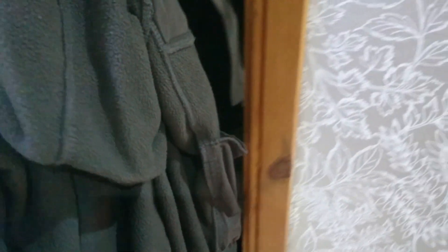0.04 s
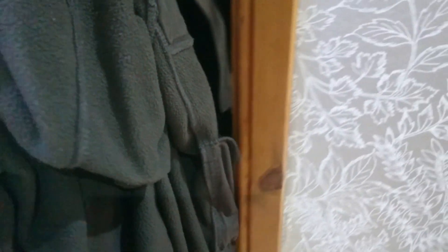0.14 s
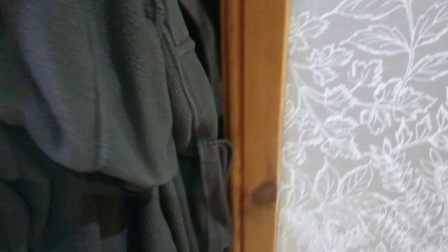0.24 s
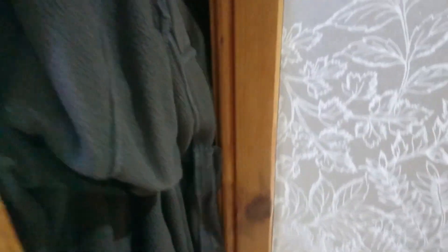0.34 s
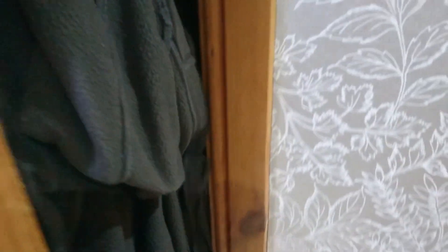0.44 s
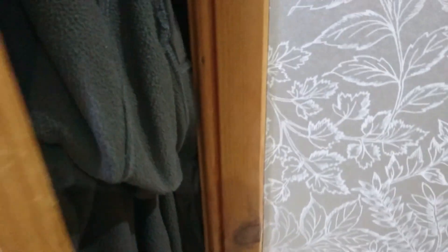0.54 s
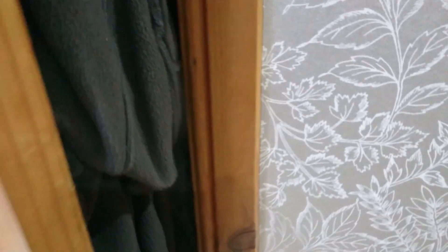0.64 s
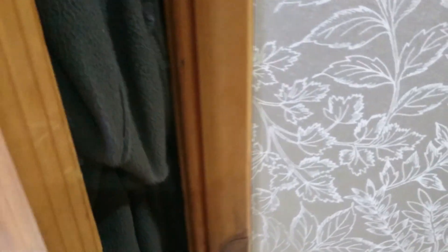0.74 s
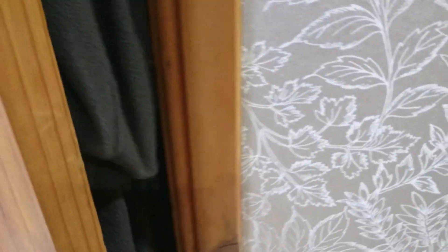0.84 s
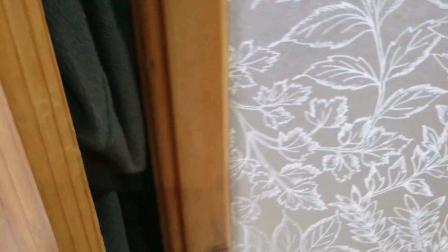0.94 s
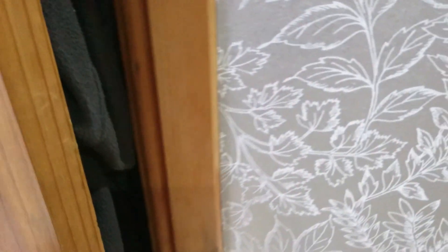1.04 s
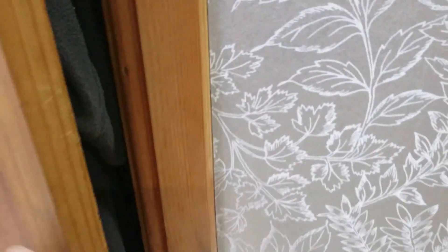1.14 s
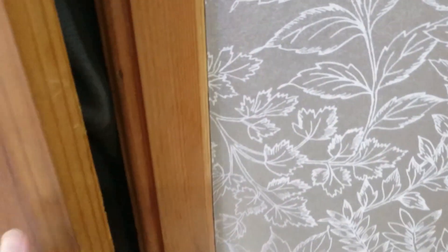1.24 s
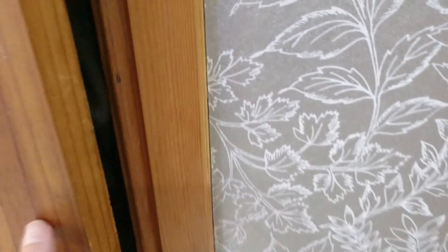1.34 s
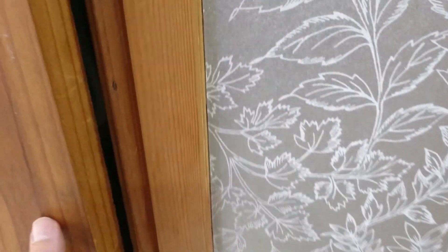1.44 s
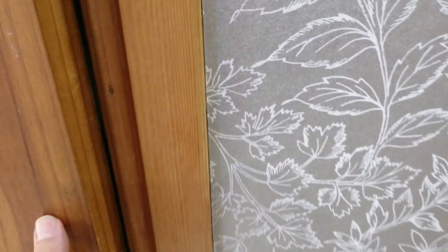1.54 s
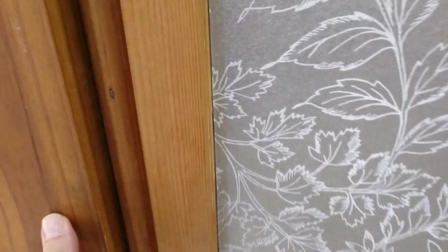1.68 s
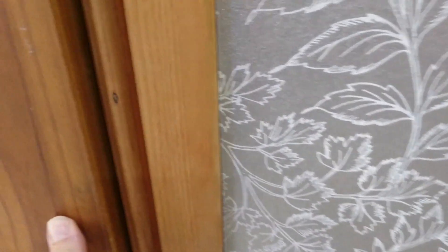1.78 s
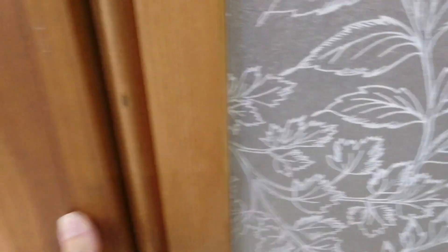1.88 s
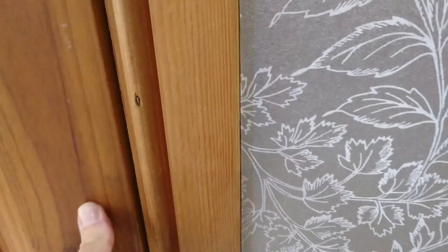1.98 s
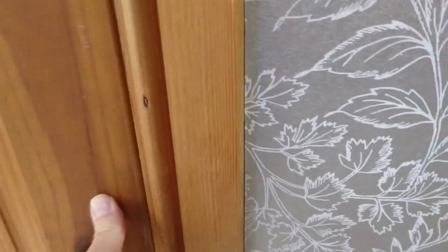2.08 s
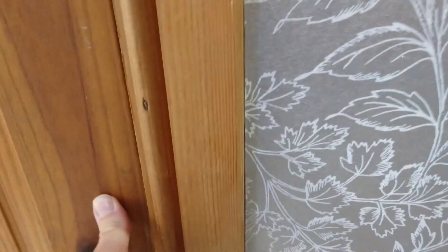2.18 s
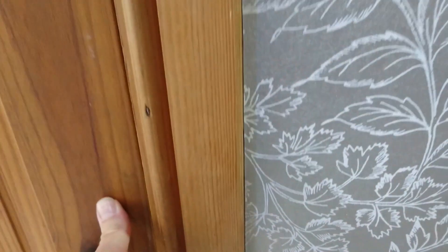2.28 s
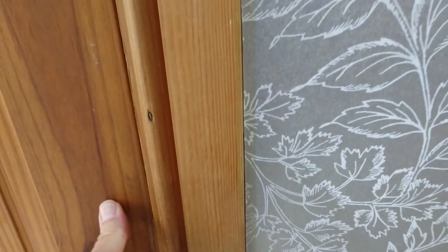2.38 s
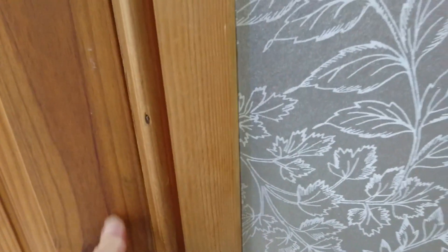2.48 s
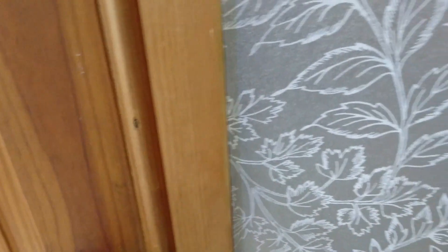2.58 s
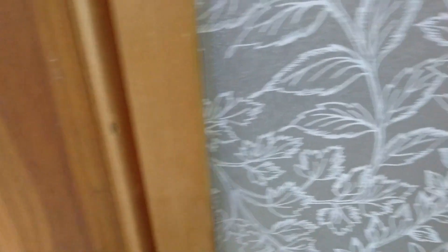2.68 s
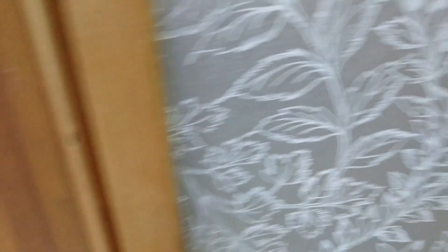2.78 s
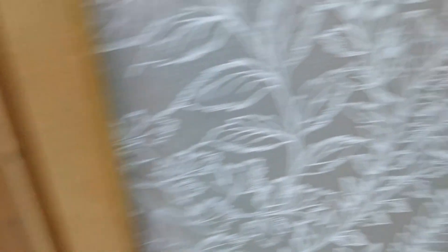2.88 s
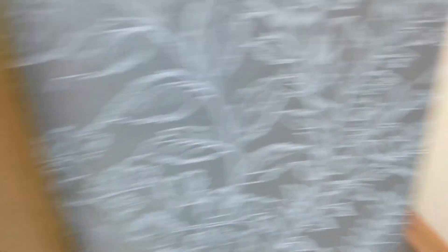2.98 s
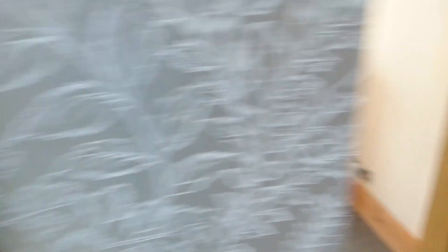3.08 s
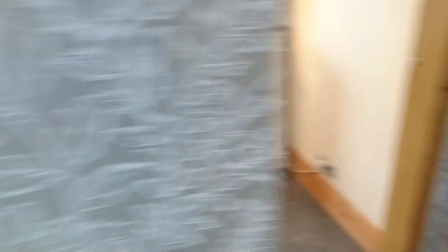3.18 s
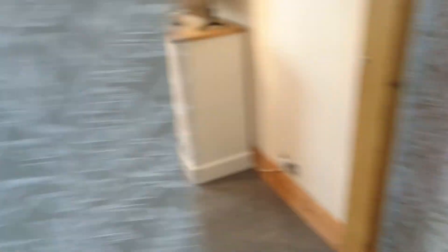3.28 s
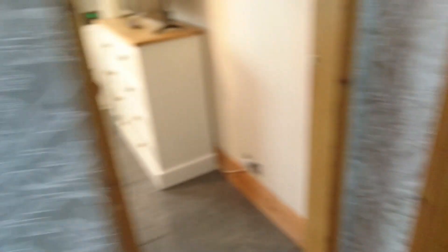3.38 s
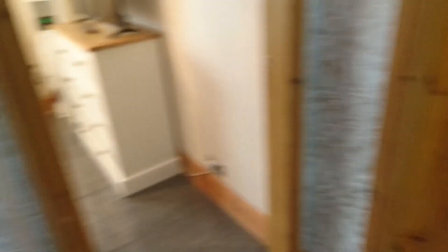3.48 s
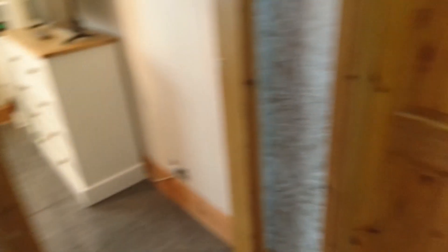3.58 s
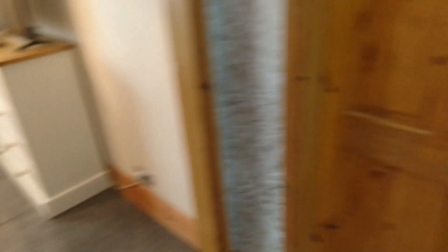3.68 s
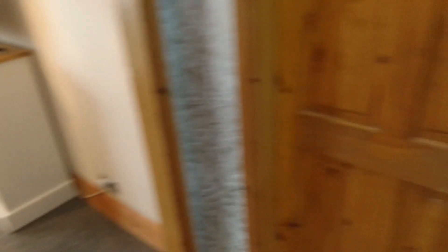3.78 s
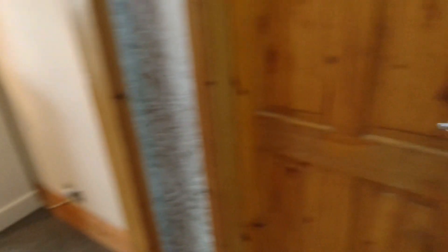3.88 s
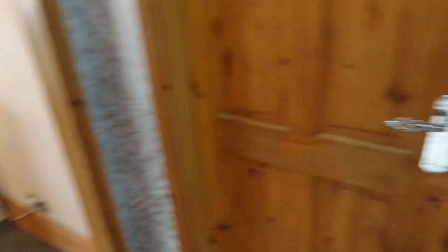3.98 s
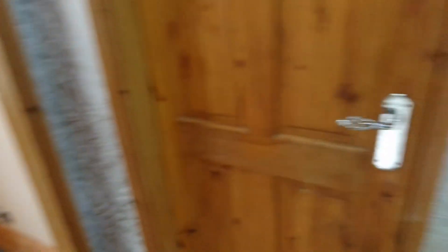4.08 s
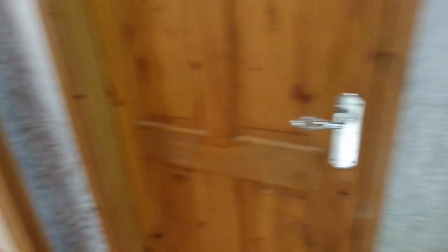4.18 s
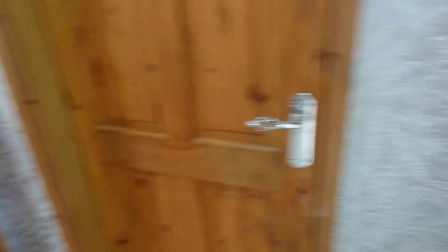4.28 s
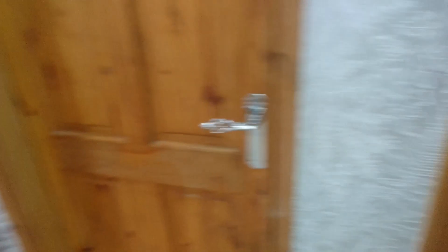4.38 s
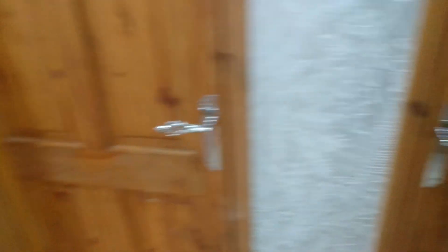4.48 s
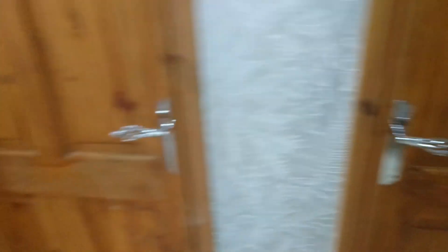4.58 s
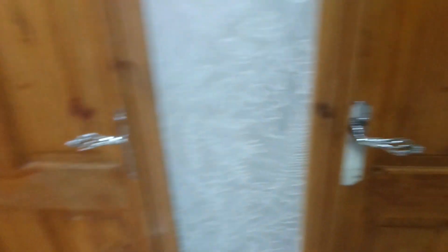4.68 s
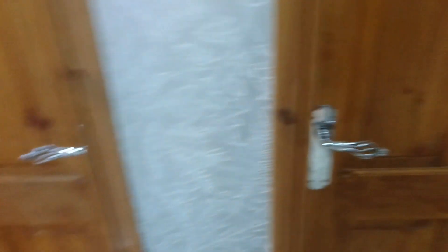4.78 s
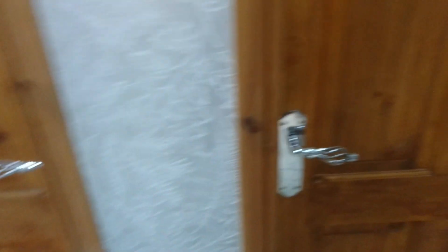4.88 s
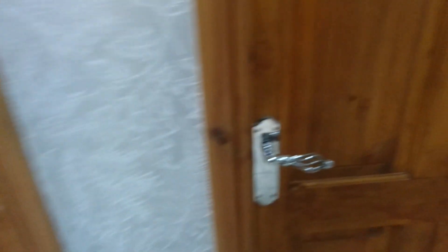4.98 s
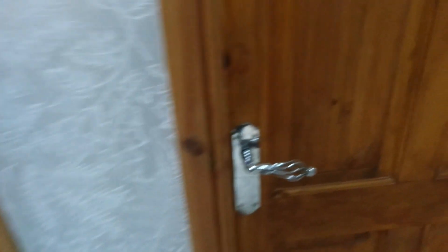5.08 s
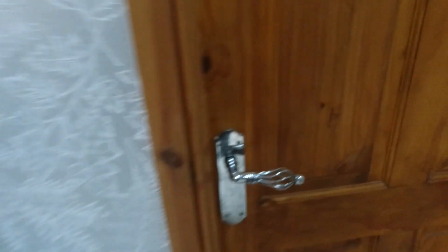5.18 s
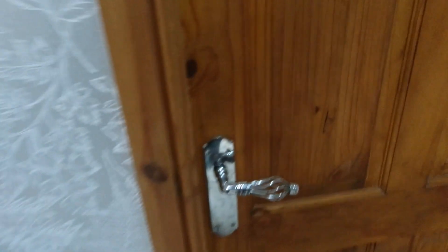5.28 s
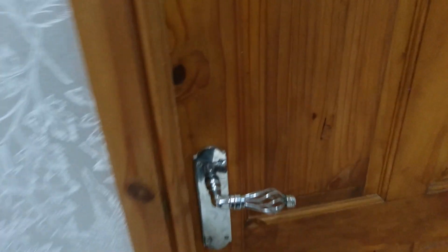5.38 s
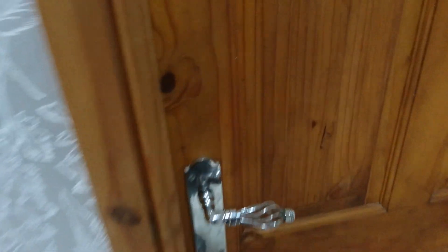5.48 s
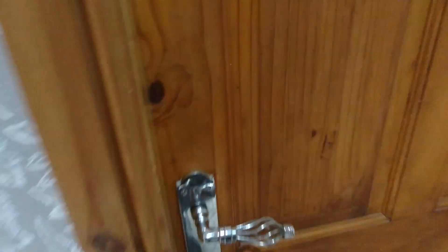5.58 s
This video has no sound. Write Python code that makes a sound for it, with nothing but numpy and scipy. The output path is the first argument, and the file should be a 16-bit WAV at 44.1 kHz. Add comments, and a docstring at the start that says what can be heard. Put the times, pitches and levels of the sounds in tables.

```python
"""In a small hallway, a pine cupboard door is pushed shut close to a hand-held phone.
Its dry hinge squeals downward in sharp pulses, the door nudges its catch, slams and rings on.
Panel, frame and metal ring as fading sine waves; cracks, soft thumps and sleeves are shaped noise.
A tiny squeak and two light knocks follow, over a steady low hum, almost all in the left ear."""
import sys
import numpy as np
from scipy import signal
from scipy.fft import rfft, irfft, next_fast_len
from scipy.io import wavfile
from scipy.ndimage import uniform_filter1d

SR = 44100
rng = np.random.default_rng(int(sys.argv[2]) if len(sys.argv) > 2 else 0)


def wrap_up_sound(samples):
    """Save the sound to the file named by the first command line argument, as 16-bit audio."""
    columns = np.atleast_2d(samples).T
    # keep every value between -1 and 1, then stretch to whole-number steps
    tamed = np.clip(columns, -1, 1)
    steps = np.round(tamed * 32767).astype(np.int16)
    wavfile.write(sys.argv[1], SR, steps)


N = 248283
T = np.arange(N) / SR  # time in seconds
SIDES = np.array([[1], [-1]])  # left, right
TOP_HZ = 15500

# Low hum, by pitch. Each row: frequency in Hz, strength in dB per Hz.
HUM_TONE = [(25, -30), (45, -18.5), (65, -11.5), (100, -14), (180, -9), (290, -12), (380, -5.5), (480, 2.5),
            (600, -1.5), (700, -11), (850, -21.5), (1000, -36.5), (2000, -78)]
# Faint room air, by pitch. Each row: frequency in Hz, strength in dB per Hz.
AIR_TONE = [(50, 8.5), (480, 0.5), (780, -10), (1000, 3), (1300, -1.5), (1550, 1), (2000, -5), (2800, -17),
            (4500, -18), (8500, -29), (9900, -19.5), (10700, -35.5), (14000, -42)]
# Strokes of the sleeve. Each row: middle in seconds, length in seconds, level in dB.
SLEEVE_STROKES = [(0.15, 0.42, -82.5), (1.9, 1.5, -68), (3.009, 0.48, -78), (3.27, 0.25, -71),
                  (3.7, 0.54, -80), (3.868, 0.053, -68.5), (4.561, .12, -78), (4.78, 0.39, -76),
                  (5.58, 0.62, -71)]
# Tone of cloth on cloth. Each row: frequency in Hz, strength in dB.
CLOTH_TONE = [(1000, -8), (2200, 6), (3200, -2.5), (4300, 2), (5500, -5), (7200, -2.5), (8500, -14.5),
              (11000, -19.5), (13000, -25)]
# How often the hinge sticks and slips. Each row: time in seconds, slips per second in Hz.
HINGE_SLIPS = [(0.344, 1239), (0.566, 1146), (0.584, 1074), (0.736, 962), (1.102, 545.6), (1.238, 566.6),
               (1.306, 507), (1.348, 504), (1.424, 446.7), (1.476, 385.3), (1.56, 393.4), (1.608, 377),
               (1.7, 301)]
# Ring of the hinge and its screws. Each row: frequency in Hz, strength in dB.
HINGE_TONE = [(500, -32), (1100, -5.5), (1600, 0.5), (2200, 4), (3300, -6.5), (4900, -3), (6100, 1.5),
              (7300, 3.5), (8200, -11.5), (10800, -13.5), (11800, -25.5), (12600, -26), (14000, -39)]
# Soft thumps of hand and feet. Each row: start in seconds, level in dB, pitch in Hz, length in seconds.
SOFT_THUMPS = [(1.567, -46.5, 116, 0.09), (1.760, -42.5, 106, 0.075), (1.839, -45.5, 116.5, 0.13),
               (1.975, -39, 145, 0.03), (2.063, -38.5, 80.5, 0.025), (3.147, -60.5, 80, 0.055),
               (3.801, -62, 130.4, 0.079), (3.93, -59.5, 74.3, 0.053), (4.57, -59.5, 80, 0.086)]
# Blows of the door. Each row: start in seconds, then the levels in dB of the panel's boom,
# the wood's knock and the metal's snap.
DOOR_BLOWS = [(1.771, -56, -75.5, -71.5), (1.805, -54, -43, -49.5), (1.985, -40, -41.5, -54.5),
              (2.177, -32.5, -40.5, -64), (2.203, -27.5, -23.5, -49.5), (2.208, -25, -26.5, -22),
              (2.2222, -26.5, -33, -35.5), (2.2347, -32, -41, -44.5)]
# Ways the door panel rings. Each row: pitch in Hz, level in dB, seconds to fade by 60 dB.
PANEL_MODES = [(62.4, -5.5, 0.24), (92.8, 3, 0.41), (106.2, 0.5, .25), (162.6, 0, 0.76), (185.6, 0.5, 0.84),
               (245.6, -3, 0.26), (297, 4.5, 0.66), (310, 3.5, 0.45)]
# Dull thud of the cupboard's carcass. Each row: frequency in Hz, strength in dB.
CARCASS_TONE = [(30, -22.5), (60, -6), (95, 6), (130, -3.5), (220, -8.5), (310, -3), (420, -15),
                (900, -31.5), (2000, -63.5)]
# Crack of wood at the contact. Each row: frequency in Hz, strength in dB.
WOOD_CRACK_TONE = [(150, -9), (310, 5), (430, 2), (650, 2), (900, -8), (1250, -2.5), (1650, -6), (2100, -6),
                   (2700, -5.5), (3600, -29), (6000, -29), (12000, -48)]
# Ways the door's uprights and frame ring. Each row: pitch in Hz before a small random shift,
# level in dB, seconds to fade by 60 dB.
FRAME_MODES = [(462, -1, 0.43), (602.2, 8, 0.22), (652, -9, 0.6), (698, -3, 0.63), (1060, 9.5, 0.23),
               (1266, -5, .33), (1307, 4, .35), (1610, -21, .3), (1762, -7, .2), (2240, -8, .22),
               (2663, -2, .2)]
# Snap of metal at the contact. Each row: frequency in Hz, strength in dB.
METAL_SNAP_TONE = [(1200, -27.5), (2800, -2), (4600, 6), (6000, 2.5), (7100, 4), (8000, -12),
                   (10500, -12.5), (11800, -32.5), (13800, -27), (16000, -41.5)]
# Ways the metal catch rings. Each row: pitch in Hz before a small random shift,
# level in dB, seconds to fade by 60 dB.
CATCH_MODES = [(4060, 2.5, 0.16), (4733, 3.5, .18), (5243, -4.5, 0.12), (6120, -6.5, .12), (6255, -4, .15),
               (6800, -3.5, 0.123)]
# Pings of the catch's spring when touched. Each row: start in seconds, level in dB, pitch in Hz.
SPRING_PINGS = [(1.8062, -49.5, 2662), (1.8060, -48, 4830), (1.9844, -43, 4940), (2.2100, -30.5, 5975)]
# Light knocks further off. Each row: start in seconds, level in dB, brightness limit in Hz,
# pitch of the wood in Hz.
LIGHT_KNOCKS = [(5.160, -45.5, 2150, 1330), (5.360, -47.5, 8850, 1866)]
# Tone of a light knock. Each row: frequency in Hz, strength in dB.
KNOCK_TONE = [(200, -7.5), (600, 12), (1000, -7.5), (1800, -3.5), (3000, -10.5), (4500, -2.5),
              (7000, -18.5), (10500, -24), (13000, -28)]
# How long the hallway echoes. Each row: frequency in Hz, seconds to fade by 60 dB.
HALL_FADES = [(100, 0.6), (500, .52), (1500, .46), (4000, 0.38), (7000, 0.33), (13000, 0.33)]
# How the phone's two microphones differ. Each row: frequency in Hz, left minus right in dB.
EAR_BALANCE = [(220, 1), (330, 3.5), (550, 16.5), (950, 6), (1350, -9.5), (2000, -7.5), (2800, 2),
               (3800, -2), (5000, 1.5), (6500, 1.5), (9000, -10.5), (13000, -1)]

# The hinge pin bites as the door gets going, and loses grip below the stall rate.
SQUEAL_DB, BITE_S, BITE_DB = -60.5, 0.11, 7
STALL_HZ, STALL_DB_PER_OCTAVE = 460, 17.5
# Spread of the slip rate: a steady part, and a part (given at the stall rate) that grows with slowing.
EVEN_PERCENT, RAGGED_PERCENT, RAGGED_POWER = .42, .6, 4.3
# Gain of the squeal's top at full grip and the stall rate, its change per dB of grip,
# and its loss per octave of faster slipping: firm grip and slow slips let go more abruptly.
SHARP_DB, SHARP_PER_DB, SHARP_DB_PER_OCTAVE = 5, 2.1, 6.5
WHISTLE_POWER = 10.3  # how steeply the pure swing dies as slipping slows


def amp(db):
    """Turn decibels into gain."""
    return 10 ** (np.asarray(db) / 20)


def unit(x):
    """Scale to an average (rms) strength of 1."""
    return x / np.sqrt(np.mean(x ** 2))


def burst(x):
    """Give a one-second sound the energy of 1/20 second at strength 1."""
    return unit(x) / np.sqrt(20)


def curve(rows):
    """Join (seconds, value) rows by straight lines."""
    return np.interp(T, *np.transpose(rows))


def at_hz(points, f):
    """Read (Hz, value) points on a log-frequency scale."""
    hz, value = np.transpose(points)
    return np.interp(np.log(f + 1), np.log(hz), value)


def colour(x, points):
    """Filter to the given (Hz, dB) tone without sounding before the input does."""
    n = x.shape[-1]
    size = 2 * next_fast_len(n // 2 + 2048)
    f = np.arange(size // 2 + 1) * SR / size
    # folding the cepstrum forward in time gives the minimum-phase filter
    cepstrum = irfft(np.log(amp(at_hz(points, f))))
    cepstrum[1:size // 2] *= 2
    cepstrum[size // 2 + 1:] = 0
    return irfft(rfft(x, size) * np.exp(rfft(cepstrum)))[..., :n]


def fade(t60):
    """One second of steady dying away, falling 60 dB in t60 seconds."""
    return np.exp(-np.log(1000) * T[:SR] / t60)


def walk(rate):
    """Smooth random wandering with a spread near 1, with about rate new values a second."""
    k = max(int(SR / rate), 1)
    steps = np.repeat(rng.standard_normal(N // k + 1), k)
    return unit(uniform_filter1d(steps, k)[:N])


def add(track, s, sound):
    """Mix a sound in at time s."""
    i = int(s * SR)
    track[..., i:i + sound.shape[-1]] += sound[..., :N - i]


def ports(x, lag_s=.00035):
    """Direct sound reaches the left microphone a moment after the right."""
    lag = int(lag_s * SR)
    return np.array([np.pad(x, (lag, 0))[:len(x)], x])


def hallway(gap_s=.004, shared_hz=420):
    """Echo as fading noise: the treble dies first, and the bass is alike in both ears."""
    f = np.arange(SR // 2 + 1)
    mid, side = rfft(rng.standard_normal((2, SR)))
    apart = f ** 4 / (f ** 4 + shared_hz ** 4)
    field = mid * np.sqrt(2 - apart) + SIDES * side * np.sqrt(apart)
    hz, t60 = np.transpose(HALL_FADES)
    # overlapping bands, each with its own fading time
    tail = sum(irfft(field * at_hz(np.c_[hz, share], f)) * fade(t)
               for share, t in zip(np.eye(len(hz)), t60))
    tail = tail * np.clip(T[:SR] / gap_s - 1, 0, 1)  # silent for gap_s, then rising
    return tail / np.sqrt(np.sum(tail ** 2) / 2)


def in_room(x, tail, wet_db):
    """Add the room's answer to the direct sound, at constant power."""
    echo = signal.fftconvolve(x[None], tail, axes=1)[:, :N]
    return (ports(x) + amp(wet_db) * echo) / np.hypot(1, amp(wet_db))


def ring(modes, detune=0):
    """Struck parts ring as fading sine waves; detune varies them with the place of contact."""
    total = np.zeros(SR)
    for k, (hz, db, t60) in enumerate(modes):
        pitch = hz * (1 + detune * rng.standard_normal())
        tone = np.sin(2 * np.pi * pitch * T[:SR])
        total += amp(db) * fade(t60) * tone * (-1) ** k  # every other one starts downward
    return burst(total)


def crack(points, t60, wet_db):
    """A dense, quickly dying noise; each contact wakes the hallway in its own way."""
    direct = ports(unit(rng.standard_normal(SR) * fade(t60)))
    return burst(colour(direct + amp(wet_db) * unit(hallway()), points))


def background(left_db=-39.0, right_db=-77, air_db=-66):
    """Filtered noise makes a hollow hum, almost all on the left, and faint air on both sides."""
    hum = unit(colour(rng.standard_normal(N), HUM_TONE)) * amp(0.27 * walk(6.1))
    air = unit(colour(rng.standard_normal((2, N)), AIR_TONE))
    return hum * amp([[left_db], [right_db]]) + air * amp(air_db + SIDES * 0.61)


def sleeve(grain_db=1.5):
    """Cloth slides over cloth with a fine uneven grain; each stroke swells and dies away."""
    power = sum(amp(db) ** 2 * np.exp(-(2 * (T - s) / length_s) ** 2)
                for s, length_s, db in SLEEVE_STROKES)
    cloth = unit(colour(rng.standard_normal((2, N)), CLOTH_TONE))
    return cloth * np.sqrt(power) * amp(grain_db * walk(60))


def grip(hz):
    """Grip of the hinge pin in dB: it builds up, holds, and gives way as the door slows."""
    biting = np.clip(1 - (T - HINGE_SLIPS[0][0]) / BITE_S, 0, 1)
    return -BITE_DB * biting - STALL_DB_PER_OCTAVE * np.maximum(np.log2(STALL_HZ / hz), 0)


def hinge(waver=0.66, flutter_db=0.5, attack_s=0.0087, rasp_db=-19, whistle_db=7, top_hz=8000):
    """Each slip of the dry pin is a sharp pulse; the pulses slow down and grow ragged with the door."""
    rate = curve(HINGE_SLIPS)
    grip_db = grip(rate)
    ragged = EVEN_PERCENT + RAGGED_PERCENT * (STALL_HZ / rate) ** RAGGED_POWER
    hz = rate * (1 + ragged / 100 * (walk(400) + waver * walk(45)))
    phase = 2 * np.pi * np.cumsum(hz) / SR

    # all harmonics up to the top, equally strong
    count = np.floor(TOP_HZ / hz)
    pulses = np.sin((count + .5) * phase) / (2 * np.sin(phase / 2) + 1e-12) - .5
    pulses = pulses / np.sqrt(count / 2)
    # the pin scrapes while it slides
    rasp = unit(rng.standard_normal(N) * (1 + np.cos(phase))) * ragged
    voice = colour(pulses + amp(rasp_db) * rasp, HINGE_TONE)

    high_pass = signal.butter(4, top_hz, "highpass", fs=SR, output="sos")
    top = signal.sosfiltfilt(high_pass, voice)
    sharp_db = SHARP_DB + SHARP_PER_DB * grip_db - SHARP_DB_PER_OCTAVE * np.log2(rate / STALL_HZ)
    voice = unit(voice + (amp(sharp_db) - 1) * top)

    # the fastest slipping is nearly a pure swing
    whistle = amp(whistle_db) * (rate / rate.max()) ** WHISTLE_POWER * np.sin(phase)
    starting = np.clip((T - HINGE_SLIPS[0][0]) / attack_s, 0, 1)
    stopping = np.clip((HINGE_SLIPS[-1][0] - T) / attack_s, 0, 1)
    level = amp(SQUEAL_DB + grip_db + flutter_db * walk(40))
    return (voice + whistle) * starting * stopping * level


def cupboard(tail, t60=0.094, early_db=0):
    """The cupboard's shorter echo joins the hallway's; gliding partials flare and dip in it."""
    early = hallway() * fade(t60)
    both = tail + amp(early_db) * early / np.sqrt(np.sum(early ** 2) / 2)
    return both / np.sqrt(np.sum(both ** 2) / 2)


def thumps():
    """Padded contacts are bass noise that swells and dies."""
    out = np.zeros(N)
    for s, db, hz, length_s in SOFT_THUMPS:
        push = rng.standard_normal(SR) * np.sin(np.pi * np.minimum(T[:SR] / length_s, 1))
        band = signal.butter(2, [hz / 1.5, hz * 1.6], "bandpass", fs=SR, output="sos")
        add(out, s, amp(db) * burst(signal.sosfilt(band, push)))
    return out


def door(tail, dulling=0.33, shove_hz=108):
    """Every blow booms in the panel, knocks in the frame and snaps the catch; its spring pings."""
    out, spring = np.zeros((2, N)), np.zeros(N)
    hardest_db = max(row[3] for row in DOOR_BLOWS)
    # the whole leaf is stopped in one short swing, and its panel rings on
    leaf = ports(amp(-7.0) * ring([(shove_hz, 0, .04)]) + amp(-3.5) * ring(PANEL_MODES))
    for s, boom_db, wood_db, metal_db in DOOR_BLOWS:
        boom = leaf + amp(-3.5) * crack(CARCASS_TONE, t60=.2, wet_db=-5.5)
        add(out, s, amp(boom_db) * boom)

        frame = ports(ring(FRAME_MODES, detune=0.0052))
        wood = crack(WOOD_CRACK_TONE, t60=.05, wet_db=2.0) + amp(-7.5) * frame
        add(out, s, amp(wood_db) * wood)

        catch = ports(ring(CATCH_MODES, detune=0.0018))
        snap = crack(METAL_SNAP_TONE, t60=0.017, wet_db=-1.0) + amp(-10.5) * catch
        # a gentler touch loses its top
        softness = [(7000, 0.0058), (14000, dulling * (metal_db - hardest_db))]
        add(out, s, amp(metal_db) * colour(snap, softness))
    for s, db, hz in SPRING_PINGS:
        add(spring, s, amp(db) * ring([(hz, 0, .008)]))
    spring = colour(spring, [(7000, -1.5), (13000, -21.5)])  # the contact is not instantaneous
    return out + in_room(spring, tail, wet_db=-13)


def squeak(s=2.555, length_s=0.053, hz=4220, db=-62, waver=0.0239, low_hz=3200, low_db=-11):
    """The door settles with one tiny, unsteady squeak that has a weaker, lower partial."""
    swell = np.sin(np.pi * np.clip((T - s) / length_s, 0, 1))
    turn = 2 * np.pi * np.cumsum(1 + waver * walk(820)) / SR
    return amp(db) * swell * (np.sin(hz * turn) + amp(low_db) * np.sin(low_hz * turn))


def knocks(wood_db=6):
    """Light knocks on wood with one broad resonance; each knock has its own brightness limit."""
    out = np.zeros((2, N))
    for s, db, bright_hz, wood_hz in LIGHT_KNOCKS:
        soft = signal.butter(4, bright_hz, fs=SR, output="sos")
        resonance = [(wood_hz / 2.7, 0), (wood_hz, wood_db), (wood_hz * 1.34, 0)]
        clack = colour(crack(KNOCK_TONE, t60=0.042, wet_db=1), resonance)
        add(out, s, amp(db) * burst(signal.sosfilt(soft, clack)))
    return out


def scene():
    """The door and the small sounds around it share one hallway."""
    tail = hallway()
    creak = amp(2.0) * in_room(hinge(), cupboard(tail), wet_db=6.0)
    small = in_room(squeak(), tail, wet_db=9) + in_room(thumps(), tail, wet_db=-10.5)
    sounds = sleeve() + creak + small + door(tail) + knocks()
    # each ear takes half of the difference between the microphones
    heard = [colour(ear, [(hz, side * db / 2) for hz, db in EAR_BALANCE])
             for ear, side in zip(sounds, (1, -1))]
    return np.array(heard) + background()


def record(dry):
    """The phone thins the deepest bass and cuts the top."""
    bass_cut = signal.butter(4, 48, "highpass", fs=SR, output="sos")
    top_cut = signal.ellip(8, .2, 70, TOP_HZ, fs=SR, output="sos")
    return signal.sosfilt(top_cut, signal.sosfilt(bass_cut, dry))


dry = scene()
out = record(dry)
wrap_up_sound(out)
```